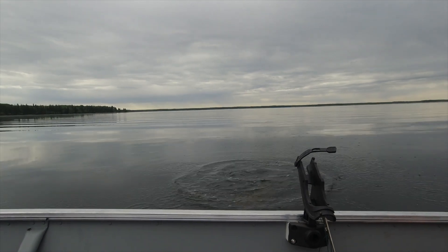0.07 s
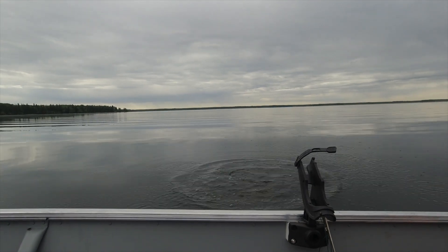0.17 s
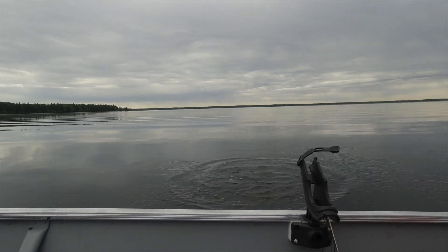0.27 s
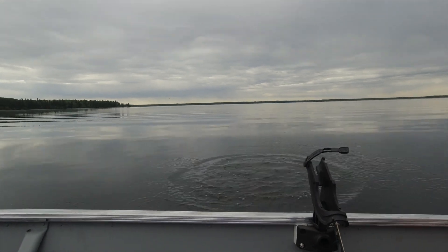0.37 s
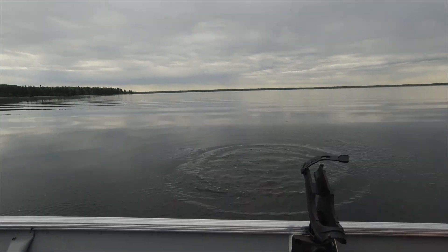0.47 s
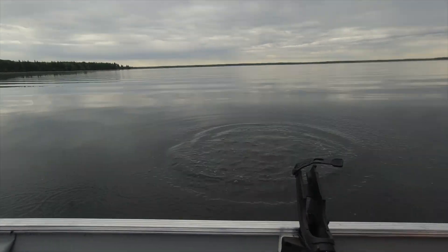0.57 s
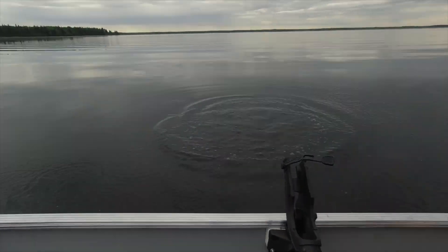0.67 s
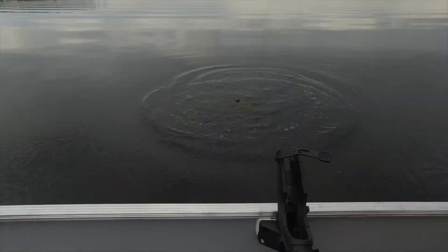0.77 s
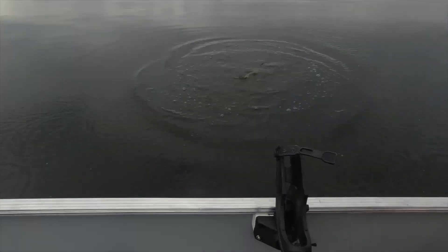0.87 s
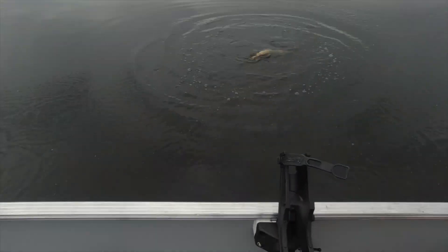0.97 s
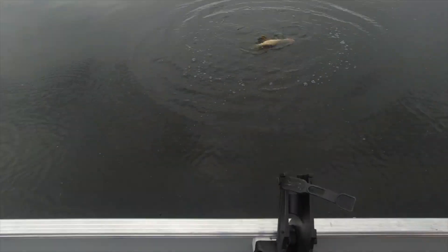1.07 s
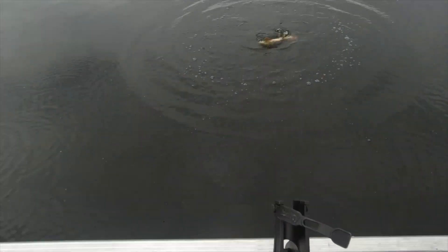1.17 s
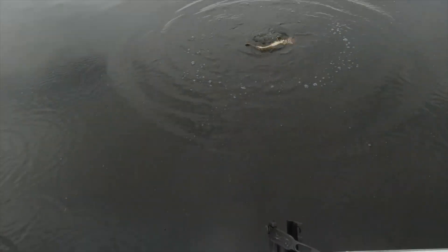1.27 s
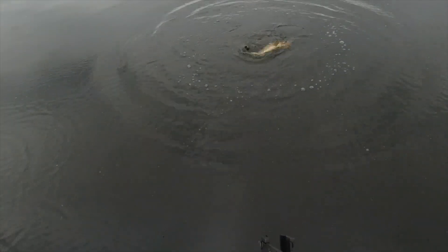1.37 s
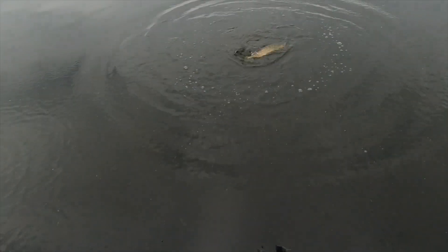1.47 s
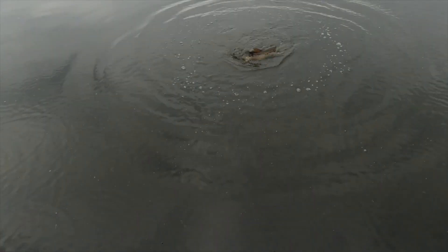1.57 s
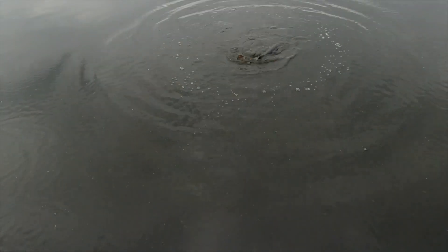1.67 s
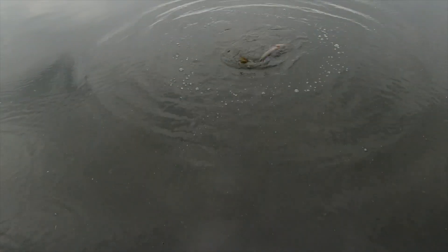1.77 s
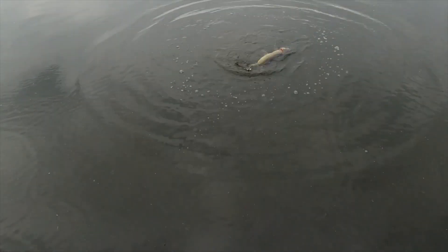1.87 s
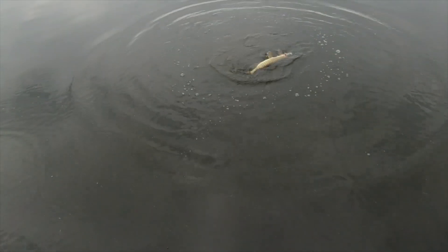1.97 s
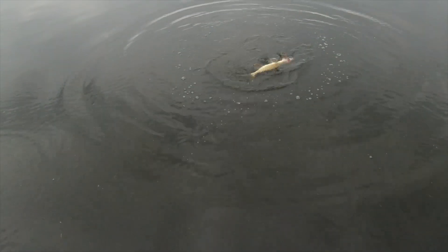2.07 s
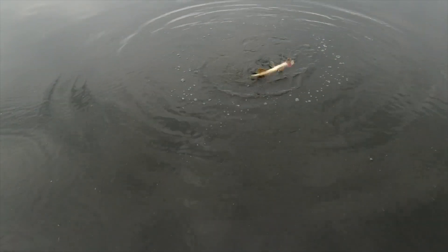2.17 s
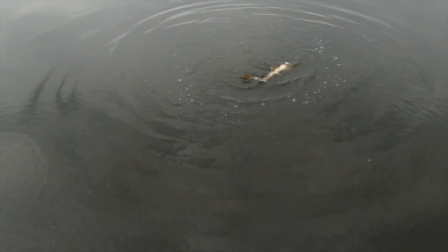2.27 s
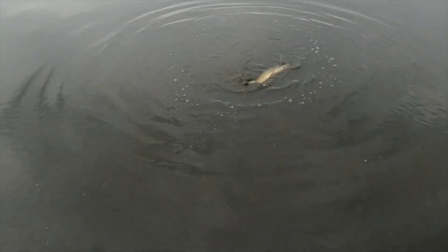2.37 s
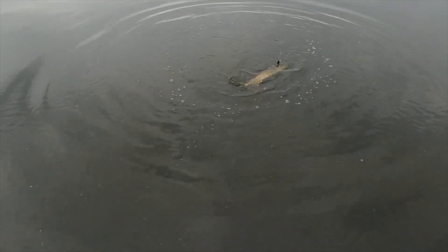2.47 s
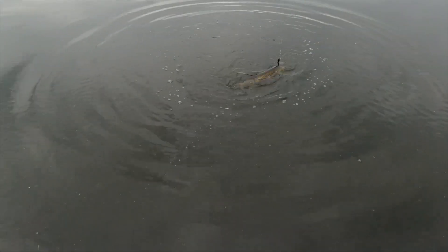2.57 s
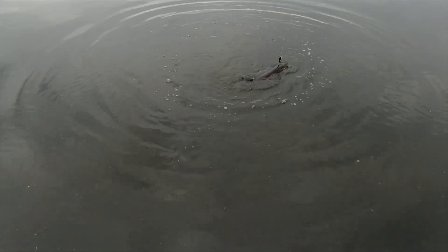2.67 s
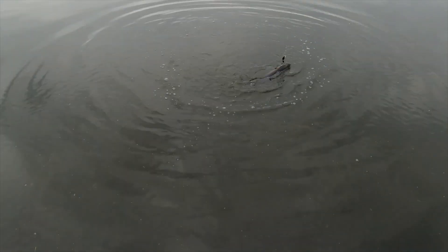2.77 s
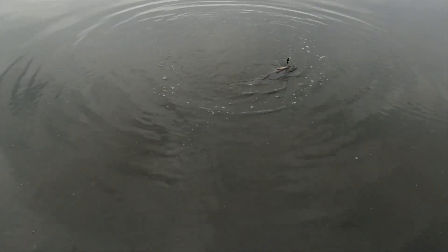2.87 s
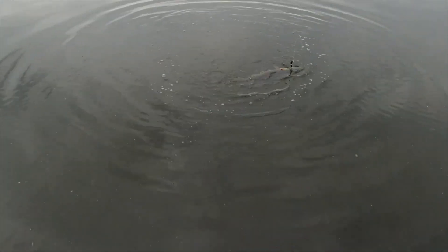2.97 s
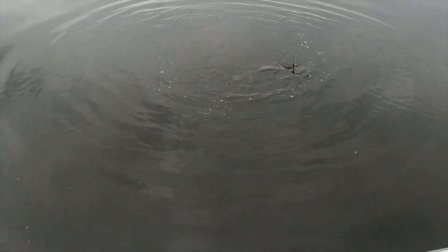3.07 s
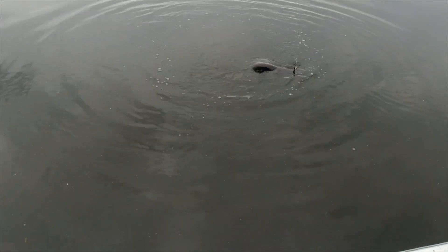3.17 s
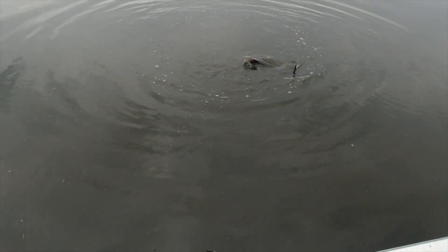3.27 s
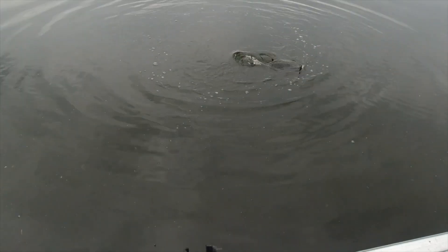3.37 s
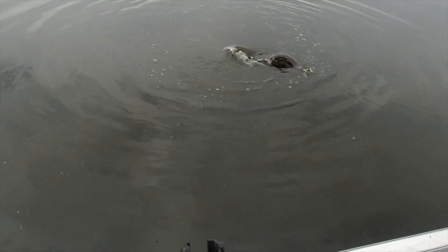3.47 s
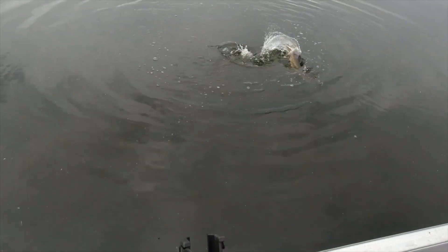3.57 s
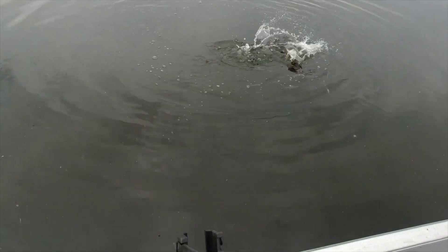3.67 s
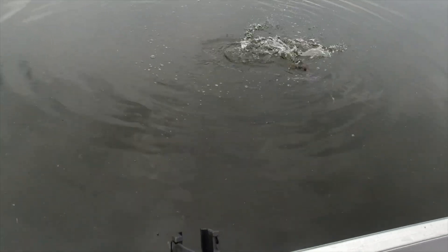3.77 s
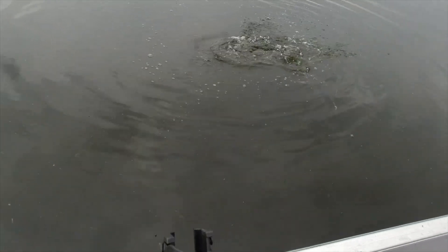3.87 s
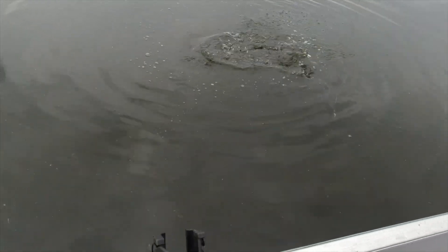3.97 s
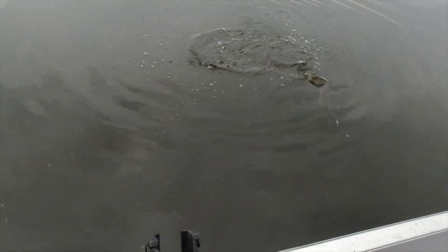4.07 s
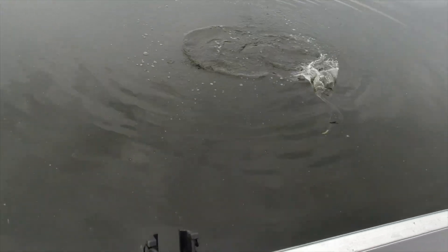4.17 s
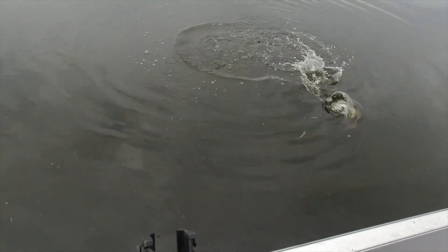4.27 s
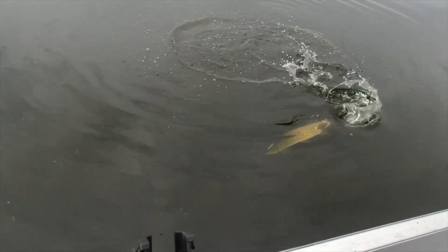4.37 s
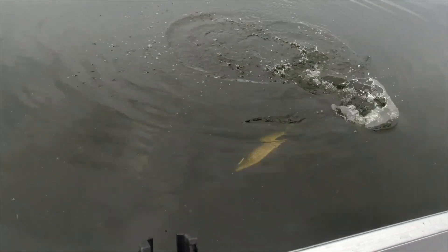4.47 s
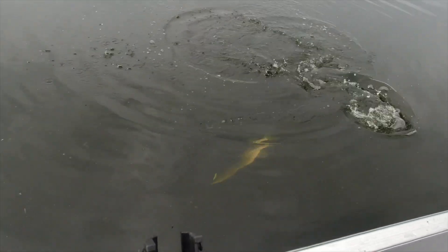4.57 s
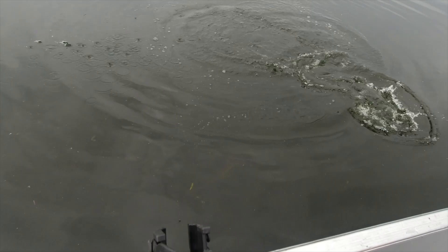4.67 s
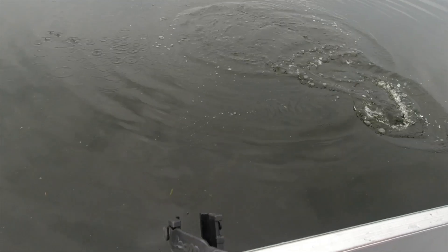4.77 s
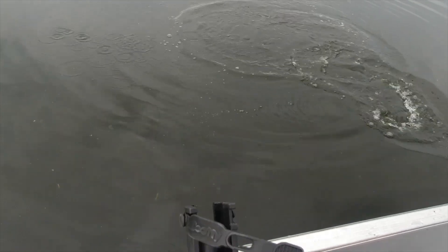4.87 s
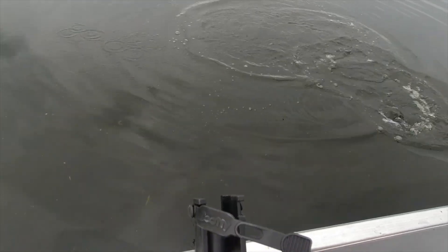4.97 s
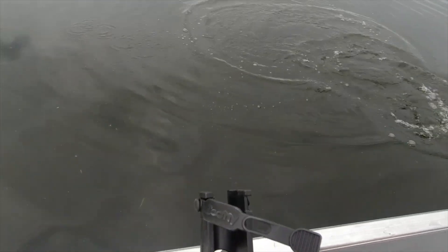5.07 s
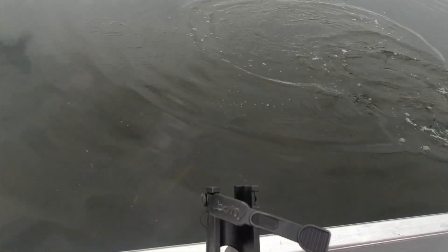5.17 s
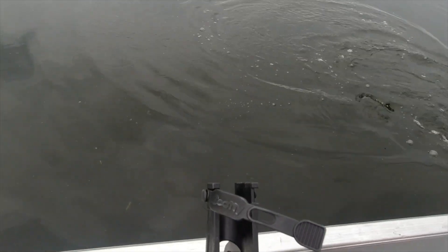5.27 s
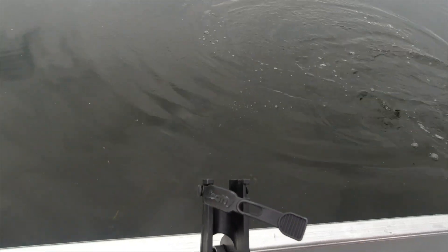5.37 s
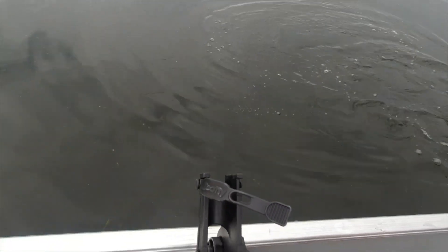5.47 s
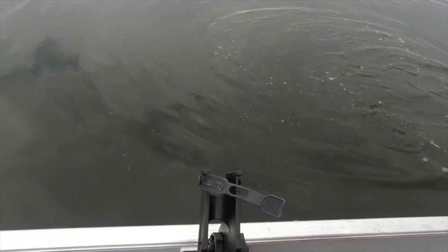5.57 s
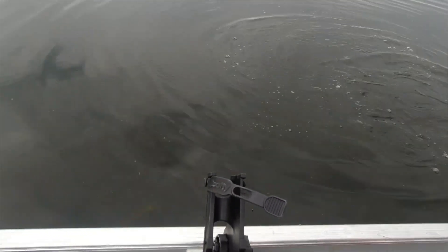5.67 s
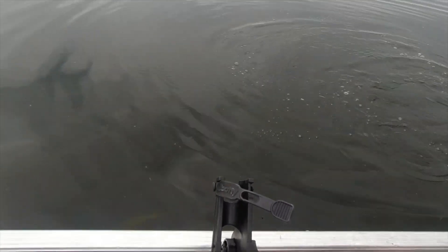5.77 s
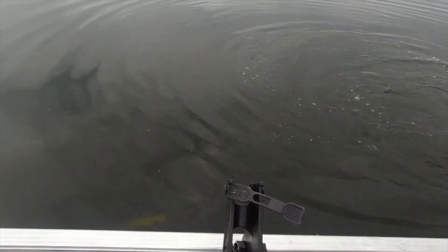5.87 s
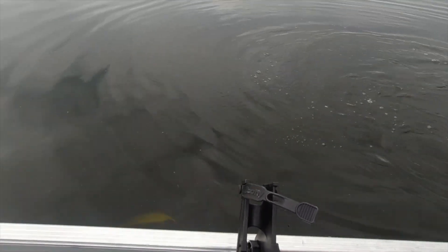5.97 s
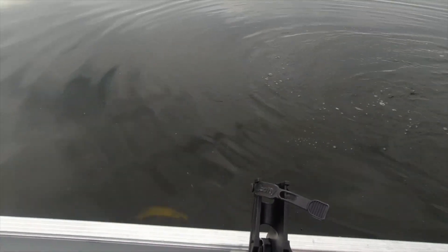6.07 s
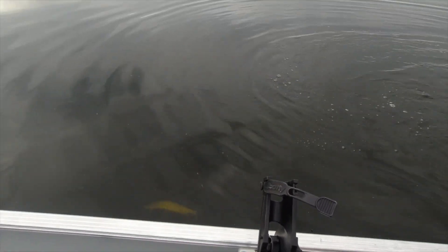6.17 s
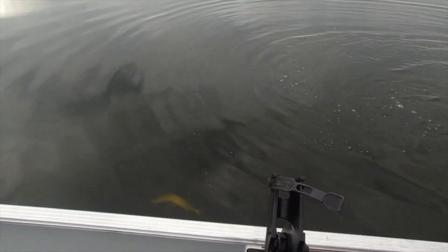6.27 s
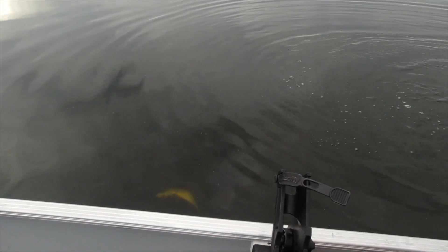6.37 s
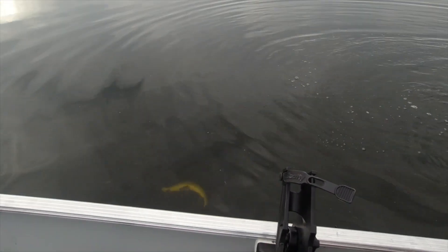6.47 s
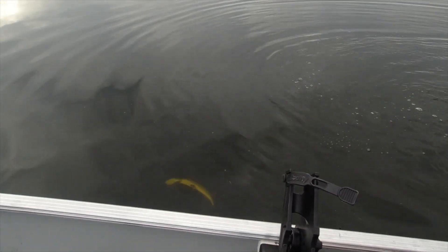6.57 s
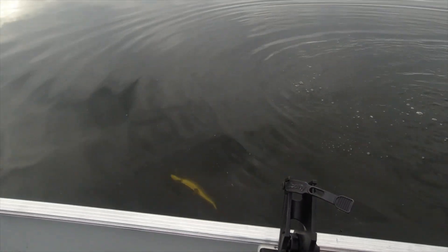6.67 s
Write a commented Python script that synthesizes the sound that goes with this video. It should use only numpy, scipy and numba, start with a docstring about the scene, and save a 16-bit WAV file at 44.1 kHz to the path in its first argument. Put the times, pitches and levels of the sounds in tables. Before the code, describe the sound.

A deep handling rumble and a few dull knocks on a metal boat hull come first, close to the microphone. Small drips and bubbles plink on a calm lake. A fish then flicks lightly at the surface twice and thrashes twice more, much louder, with gurgling water and crackling spray. The splashing dies away into a faint fizz of foam and a few last drips over very quiet ripples.

```python
"""A deep rumble and dull hull knocks come first, as a camera is jostled in a metal boat on a calm lake.
Drips follow, then a fish thrashes at the surface four times. Trapped air bubbles resonate and glide in
pitch, large ones gurgling low and small ones pinging high, while droplet impacts crackle as spray.
Foam fizzes afterwards, over lapping ripples, a faint hum, far tones and a distant bird."""
import sys
import numpy as np
from scipy import signal
from scipy.fft import rfft, irfft
from scipy.io import wavfile
from scipy.ndimage import uniform_filter1d
from numba import njit

SR = 44100
rng = np.random.default_rng(int(sys.argv[2]) if len(sys.argv) > 2 else 0)


def generate_wav(signal):
    """Clip the signal to [-1, 1] and save it as 16-bit WAV at the path in sys.argv[1]."""
    frames = np.transpose(np.atleast_2d(signal))
    scaled = np.clip(frames, -1, 1) * 32767
    pcm = np.round(scaled).astype(np.int16)
    wavfile.write(sys.argv[1], SR, pcm)


N = 296175

# Envelopes, one span for each thrash of the fish: time_s, spray_gain_db, gurgle_gain_db
THRASHES = [
    [(2.95, -70, -91), (2.966, -57, -59), (2.974, -38, -57), (3.008, -55, -53), (3.018, -43, -50.5),
     (3.12, -100, -75), (3.16, -110, -87)],
    [(3.26, -79, -94), (3.308, -53.5, -66), (3.354, -76, -60), (3.4, -77, -110)],
    [(3.43, -65, -90), (3.448, -52, -58), (3.47, -52.5, -40.5), (3.538, -36, -33), (3.66, -45.5, -41.5),
     (3.706, -37.5, -44.5), (3.864, -47, -54.5), (3.96, -57, -60.5), (4.02, -75, -90)],
    [(4.166, -48.5, -75), (4.222, -39.5, -31.5), (4.272, -40.5, -28.5), (4.43, -34.5, -33.5),
     (4.596, -41, -31.5), (4.63, -33, -35.5), (4.724, -52, -40), (4.852, -50, -46.5), (4.92, -57.5, -45),
     (5.05, -97, -61.5), (5.12, -100, -71)],
]
# Middle resonance of the large bubbles in each thrash: pitch_hz
GURGLE_PITCHES = [594, 910, 902, 789.5]
# Mist against spray in each thrash (a light flick throws little): gain_db
MIST_GAINS = [-28, -31, -12.5, -13]
# Single bubbles: start_s, pitch_hz, target_hz, t60_s, level_db
BUBBLES = [(0.975, 2620, 2250, 0.02, -56.5), (1.011, 1390, 1230, 0.046, -45.5),
           (1.011, 4280, 4500, 0.018, -46.5), (1.018, 1120, 930, 0.082, -45.5),
           (1.163, 1500, 1420, 0.076, -46.5), (1.172, 1026, 1350, 0.11, -52),
           (1.18, 1530, 2100, 0.051, -57), (1.221, 920, 1290, 0.13, -55.5), (1.221, 2040, 2240, 0.045, -58),
           (1.224, 1580, 1315, 0.078, -54), (1.257, 1045, 1430, 0.059, -54), (1.34, 1600, 1620, .06, -62.5),
           (1.394, 1630, 2010, 0.039, -55), (1.415, 1780, 1894, 0.033, -55.5),
           (1.436, 1070, 860, 0.044, -47.5), (1.231, 2930, 2950, .027, -60), (1.27, 2530, 2400, .03, -62),
           (1.539, 2250, 2130, .04, -65), (1.655, 3460, 3500, .007, -47), (1.735, 1546, 1460, 0.027, -65),
           (2.378, 3359, 3340, 0.03, -62), (1.487, 2860, 2860, 0.02, -56.5), (1.498, 890, 990, 0.11, -61),
           (1.601, 4230, 4220, .022, -54), (1.645, 966, 792, 0.11, -44.5), (1.769, 2910, 2700, 0.11, -65),
           (1.779, 1850, 1690, .031, -54.5), (1.985, 2350, 2440, 0.037, -64.5),
           (2.16, 2410, 2320, .012, -54), (2.27, 1336, 1270, 0.046, -59), (2.333, 2260, 1959, 0.026, -58.5),
           (2.42, 766, 701, 0.28, -62), (2.418, 1990, 1650, 0.026, -51.5),
           (2.429, 1430, 1800, 0.051, -53.5), (2.443, 995, 826, .16, -59), (2.46, 1920, 1830, 0.097, -60.5),
           (2.469, 2720, 2560, 0.02, -42.5), (2.502, 2160, 2800, 0.019, -49), (2.558, 1980, 1800, .04, -63),
           (2.707, 1840, 2400, .037, -50), (2.708, 1557, 1600, 0.069, -43.5),
           (2.72, 1600, 1950, 0.048, -54), (2.784, 1133, 1400, 0.055, -44.5),
           (2.971, 2660, 2690, 0.18, -44.5), (2.974, 1330, 1420, 0.068, -44), (2.978, 377, 422, 0.32, -56),
           (3.017, 1310, 1295, 0.15, -55), (3.205, 1900, 1820, 0.023, -50.5),
           (3.216, 4260, 4000, 0.017, -39), (3.22, 2000, 1790, 0.022, -40.5),
           (3.231, 1421, 1320, 0.04, -58), (3.259, 4070, 4630, 0.033, -49.5), (3.28, 895, 940, 0.058, -54),
           (3.302, 1295, 1335, .19, -57.5), (3.307, 2940, 3300, 0.027, -48), (3.308, 799, 870, 0.17, -53.5),
           (3.311, 286, 266, 0.04, -51.5), (3.42, 2450, 2217, 0.028, -50.5), (3.431, 2750, 2720, 0.02, -49),
           (3.445, 1750, 1370, 0.12, -40), (3.449, 2500, 2370, 0.0064, -18), (3.466, 1710, 1690, .027, -37),
           (3.475, 422, 365, 0.1, -32), (3.486, 1440, 1655, 0.028, -18), (3.491, 436, 810, .12, -23),
           (3.52, 759, 934, .05, -24), (3.528, 1890, 2150, .036, -26.5), (3.56, 870, 1100, 0.039, -30),
           (3.564, 2720, 2880, 0.011, -19.5), (3.497, 637, 1070, .082, -32.5), (3.665, 575, 795, .08, -48),
           (3.684, 863, 1450, 0.08, -41), (3.582, 1695, 1800, 0.11, -37), (3.622, 1240, 1080, 0.036, -26.5),
           (3.713, 1076, 1480, 0.1, -41), (3.736, 1130, 1070, 0.023, -29), (3.75, 2300, 2100, .041, -41),
           (3.756, 837, 1070, 0.076, -33), (3.806, 2770, 2560, 0.036, -39),
           (3.815, 1074, 1190, 0.068, -38.5), (3.834, 720, 626, .043, -42.5),
           (3.883, 1260, 1270, .025, -34), (3.9, 504, 1110, 0.15, -48.5), (3.913, 1330, 1870, .121, -54),
           (3.929, 788, 1220, 0.21, -51.5), (3.97, 1220, 1680, 0.054, -52.5),
           (4.06, 2450, 2648, .022, -48.5), (4.076, 4242, 4440, 0.0097, -49),
           (4.116, 4020, 4050, 0.036, -47), (4.158, 2720, 2750, 0.013, -38),
           (4.159, 3400, 3420, 0.0034, -27.5), (4.216, 1370, 1250, 0.11, -30),
           (4.219, 1084, 1150, 0.098, -28), (4.227, 740, 700, .065, -27.5),
           (4.227, 2740, 2600, 0.062, -29.5), (4.259, 574, 628, 0.11, -28.5),
           (4.301, 363, 377, 0.31, -37.5), (4.31, 2550, 2440, 0.025, -26), (4.315, 873, 925, 0.083, -26.5),
           (4.328, 1240, 1170, 0.027, -24.5), (4.326, 1740, 1530, .017, -16),
           (4.362, 1024, 1140, 0.1, -32.5), (4.418, 685, 611, 0.18, -34.5), (4.44, 497, 542, 0.24, -30),
           (4.454, 1160, 1160, 0.027, -24), (4.491, 583, 860, 0.14, -29.5), (4.515, 895, 1190, .06, -34),
           (4.558, 618, 670, 0.14, -26.7), (4.61, 279, 275, .25, -35.5), (4.611, 584, 523, 0.23, -35),
           (4.666, 557, 566, 0.11, -33), (4.668, 292, 356, 0.22, -32.5), (4.675, 687, 950, 0.07, -30),
           (4.734, 1520, 1400, 0.058, -36), (4.751, 1460, 1580, 0.03, -34.5),
           (4.832, 1100, 1160, 0.043, -41), (4.848, 383, 444, 0.1, -43.5), (4.867, 1580, 1705, 0.16, -46),
           (4.915, 1052, 1270, 0.11, -43), (4.924, 1840, 1630, .017, -44), (4.949, 1820, 1780, 0.039, -45),
           (5.012, 474, 430, 0.067, -55), (5.015, 830, 810, .031, -45.5), (5.016, 2100, 2390, 0.017, -44),
           (5.291, 660, 630, 0.14, -53), (5.313, 1430, 1690, .063, -64), (5.328, 1700, 1330, 0.081, -59),
           (5.35, 690, 1685, 0.051, -44.5), (5.405, 2150, 2270, 0.058, -66), (5.44, 735, 722, 0.083, -63.5),
           (5.439, 1130, 1120, 0.079, -65), (5.485, 1640, 1530, 0.039, -53),
           (5.67, 2190, 2260, 0.044, -63.5), (6.307, 274.7, 283, 0.19, -60.5)]
# Drops and slaps striking the water: start_s, level_db, centre_hz
DROP_IMPACTS = [(0.822, -60, 2800), (0.856, -63, 5750), (0.9747, -59, 2470), (1.013, -50.5, 3730),
                (1.1619, -48.5, 2300), (1.2287, -53.5, 2960), (1.27, -56, 2440), (1.4082, -54, 3580),
                (1.4356, -50.5, 3140), (1.4671, -53.5, 4340), (1.487, -56, 2780), (1.6362, -53, 4350),
                (1.6543, -45.5, 3360), (1.7695, -52, 2810), (1.9226, -58, 2440), (2.1585, -52, 2640),
                (2.377, -55, 3350), (2.397, -50, 7500), (2.408, -55, 5400), (2.43, -55, 7150),
                (2.4482, -53.5, 3970), (2.7068, -50.5, 2070), (2.7683, -53.5, 4500), (2.9547, -37, 3640),
                (2.9702, -27.5, 3880), (3.0133, -50, 2430), (3.2141, -44.5, 4200), (3.2595, -53, 4010),
                (3.225, -45, 4500), (3.32, -59, 5440), (3.447, -30, 2500), (3.484, -26, 2000),
                (3.5048, -23, 2880), (3.562, -34, 2830), (3.6232, -23, 4660), (3.785, -38, 3830),
                (3.846, -27.5, 3820), (4.1164, -43.5, 4130), (4.1986, -21.5, 4470), (4.2263, -29, 2700),
                (4.2682, -23.5, 3370), (4.3107, -21.5, 2480), (4.3434, -21, 2300), (4.4195, -22, 4200),
                (4.4593, -19, 2290), (4.5195, -25, 3380), (4.6327, -17.5, 5070), (4.7551, -27.5, 2850),
                (4.8698, -32, 2280), (6.1238, -54.5, 6260), (6.6471, -46.5, 3100)]
# Envelopes, one span for each jostle of the camera: time_s, gain_db
JOSTLES = [
    [(0.0, -69.5), (0.238, -59), (0.285, -16.5), (0.45, -16), (0.6, -26), (0.78, -39.5), (0.9, -45),
     (1.08, -39), (1.23, -37.5), (1.304, -65), (1.45, -76)],
    [(4.24, -65.5), (4.29, -57), (4.4, -49), (4.455, -62), (4.5, -50), (4.66, -54), (4.72, -76)],
]
# Knocks on the hull: start_s, gain_db, hardness_db_per_mode
KNOCKS = [(0.35, -37, 8), (0.408, -37, 6.5), (0.513, -32.5, 3), (0.609, -39.5, 2.5), (0.734, -59, 6),
          (0.819, -69, 7.5), (1.051, -55.5, 5), (1.211, -66, 7), (2.519, -58.5, 7), (3.028, -47.5, 9),
          (4.286, -52, 9), (6.313, -52.5, 8)]
# Normal modes of the hull: pitch_hz, gain_db, t60_s
HULL_MODES = [(141.4, 4.5, 0.13), (225, -6.5, 0.17), (258, -17, 0.095), (340, -27, .15),
              (510, -33.5, 0.017)]
# Clacks of the camera housing: start_s, level_db, centre_hz, t60_s, relative_treble_db
CLACKS = [(.312, -63, 1200, .03, -38), (.343, -57, 2510, .03, -24), (.363, -34, 1080, .03, -49),
          (.367, -48.5, 4200, .015, -20), (.373, -38, 1080, .045, -47.5), (.409, -44, 3670, 0.02, -23.5),
          (.41, -46, 1680, .02, -39), (.422, -54.5, 3450, .02, -24.5), (.513, -51, 2770, .015, -21.5),
          (6.65, -57, 860, 0.11, -30), (6.69, -56, 870, 0.22, -22), (6.71, -53, 800, .06, -30)]
# Envelopes of foam, ripples and the rocking boat: time_s, fizz_db, lapping_db, rocking_db
LAKE_LEVELS = [(0.0, -67, -70, -73), (0.23, -74, -76, -68), (0.44, -87.5, -67, -76.5),
               (0.82, -79.5, -81, -70), (1.67, -77.5, -80.5, -71.5), (2.3, -79.5, -81.5, -72.5),
               (3.1, -80, -78.5, -76), (3.45, -75, -72.5, -68), (3.95, -70.5, -84, -70.5),
               (4.5, -56.5, -73, -61), (5.08, -70, -72, -61.5), (5.35, -70.5, -76, -64),
               (5.68, -76, -78.5, -66), (5.9, -77.5, -77.5, -67), (6.36, -81.5, -67.5, -69),
               (6.72, -75.5, -74, -59.5)]
# Spectrum of the foam: frequency_hz, gain_db
FIZZ_SPECTRUM = [(900, 2.5), (2000, 3), (3300, 1.5), (4800, 2.5), (6500, -4), (9000, -8), (12500, -14)]
# Spectrum of the still air: frequency_hz, gain_db
AIR_SPECTRUM = [(53, -31.5), (90, 10), (255, -3.5), (623, -15), (706, -13.5), (869, -6), (1800, -18),
                (5430, -25.5), (12200, -33), (13000, -39)]
# Partials of the hum: pitch_hz, level_db
HUM_PARTIALS = [(64, -78), (129, -79)]
# Far tones: start_s, pitch_hz, target_hz, swell_s, t60_s, level_db
FAR_TONES = [(1.25, 625, 623, 0.086, 3, -79.5), (2.749, 305, 286, 0.12, .8, -73),
             (2.998, 174, 176.3, 0.065, 0.55, -62.5), (3.301, 411, 417, 0.072, 0.41, -67.5),
             (4.0, 668, 659, 0.11, 0.6, -75.5)]
# Chips of a far bird: start_s, level_db
BIRD_CHIPS = [(6.078, -78), (6.195, -83), (6.312, -77), (6.433, -75.5), (6.552, -77)]


def gurgle():
    """Large air pockets resonate low; many overlapping resonances merge into a gurgle."""
    centre_hz = each_thrash(GURGLE_PITCHES, between=800)
    pockets = swarm(count=1800, centre_hz=centre_hz, octaves=1.6, cycles=20, rise=.35, scatter_db=3.3)
    return unit(pockets + .6 * noise_band(520, 1300)) * undb(curve(THRASHES, 2) - 5.5)


def spray():
    """Droplet impacts click and small bubbles resonate; each size of drop falls in its own patches."""
    out = 0
    for hz in (1800., 2900., 4500.):
        pings = swarm(count=1400, centre_hz=hz, octaves=.8, cycles=20, rise=.25, scatter_db=4.2)
        clicks = unit(band(crackle(per_s=1500, scatter_db=.85, hiss=.64), .66 * hz, 1.154 * hz))
        out = out + (pings + 1.07 * clicks) * undb(3.1 * walk(45))
    return unit(out) * undb(curve(THRASHES, 1))


def mist():
    """The finest impacts superpose into a hiss that grows and fades more steeply than the spray."""
    spectrum = [(4000, -14.5), (5800, -6.5), (8000, -8), (11000, -14), (15500, -21), (17000, -22.5)]
    hiss = coloured(crackle(per_s=2700, scatter_db=1.4, hiss=.32), spectrum)
    spray_db = curve(THRASHES, 1)
    steepening_db = .42 * (spray_db + 34.5)
    return hiss * undb(spray_db + each_thrash(MIST_GAINS, between=0) + steepening_db + 3.6 * walk(67))


def bubbles():
    """Minnaert resonance: a bubble pinches off with a snap, then its air acts as a spring on the water."""
    start_s, hz, target_hz, t60_s, level_db = np.array(BUBBLES, float).T
    climb_octaves = np.maximum(np.log2(target_hz / hz), 0)
    swell_s = .87 / hz + .012 * climb_octaves ** 2
    snaps = np.zeros(N)
    snap_sizes = undb(level_db + 1) * .0002 / swell_s  # an abrupt onset snaps harder
    np.add.at(snaps, (start_s * SR).astype(int), snap_sizes)
    ruffle = undb(1.2 * walk(200))  # the rippling surface ruffles each ring
    rings = ring(start_s, hz, target_hz, swell_s, t60_s, undb(level_db), glide_share=.22)
    return ruffle * rings + band(snaps, 750, 7000)


def drop_impacts():
    """A brief impact has a broad spectrum, so drops and slaps on the water sound as ticks."""
    t60_s, treble_db = .016, -27
    return bursts([row + (t60_s, treble_db) for row in DROP_IMPACTS], low_ratio=.52, high_ratio=1.36)


def camera_rumble():
    """Slow, irregular sway of the housing gives a deep rumble; friction adds a rough rub above it."""
    rub = undb(-28.5 + 3 * walk(30)) * noise_band(55, 125, order=3)
    sway = noise_band(22, 43.7, order=4)
    return (sway + rub) * uniform_filter1d(undb(curve(JOSTLES, 1)), 900)


def hull_knocks():
    """A blow excites the damped normal modes of the hull; a harder one favours the higher modes."""
    modes = [(start_s, hz, knock_db + mode_db + k * hardness_db, t60_s)
             for start_s, knock_db, hardness_db in KNOCKS
             for k, (hz, mode_db, t60_s) in enumerate(HULL_MODES)]
    start_s, hz, gain_db, t60_s = np.transpose(modes)
    detune, strength = rng.standard_normal((len(modes), 2)).T
    hz = hz * (1 + .021 * detune)
    swell_s = np.full(len(modes), .0035)
    return ring(start_s, hz, hz, swell_s, t60_s, undb(gain_db - 7.5 + 2.2 * strength), glide_share=1.)


def camera_clacks():
    """Resonance of the hollow housing confines most of each clack to a narrow band."""
    return bursts(CLACKS, low_ratio=.8, high_ratio=1.2)


def foam():
    """Tiny bubbles resonate high as foam pops; faint lone pops and droplets persist on the calm water."""
    pops = swarm(count=260, centre_hz=4400., octaves=.8, cycles=25, rise=.1, scatter_db=3.)
    droplets = unit(band(crackle(per_s=25, scatter_db=3., hiss=.01), 5000, 10500))
    fizz = coloured(crackle(per_s=1500, scatter_db=2.5, hiss=1.2), FIZZ_SPECTRUM) * undb(1.1 * walk(40))
    envelope = undb(curve([LAKE_LEVELS], 1) + .49 * walk(27))
    return (fizz + .35 * pops) * envelope + undb(-91.5) * (pops + .3 * droplets)


def ripples():
    """Slow motion makes low-frequency noise: ripples lap and the boat rocks gently."""
    lapping = noise_band(51, 280, order=1) * undb(curve([LAKE_LEVELS], 2) + .2 * walk(2.5))
    rocking = noise_band(4.1, 57, order=3) * undb(curve([LAKE_LEVELS], 3) + 1.7 * walk(2.2))
    return lapping + rocking


def air():
    """Still air is a nearly steady broadband noise, weighted to the bass."""
    return coloured(rng.standard_normal(N), AIR_SPECTRUM) * undb(-85.5 + .38 * walk(.98))


def hum():
    """Two low partials waver under slow random amplitude and frequency modulation."""
    out = 0
    for hz, level_db in HUM_PARTIALS:
        amplitude = undb(level_db + 2.9 * walk(.9))
        phase = 2 * np.pi * hz * np.cumsum(1 + .0037 * walk(7.8)) / SR
        out = out + amplitude * np.sin(phase)
    return out


def far_chirr():
    """Narrowband noise is heard as a thin whistle; random amplitude modulation makes it throb."""
    start_s, end_s = 2.05, 3.4
    t = np.arange(N) / SR
    return noise_band(3170, 3470) * undb(-87 + 4 * walk(40)) * (t > start_s) * (t < end_s)


def far_tones():
    """Faint tones from across the water swell, then decay exponentially with a fluttering level."""
    start_s, hz, target_hz, swell_s, t60_s, level_db = np.array(FAR_TONES, float).T
    tones = ring(start_s, hz, target_hz, swell_s, t60_s, undb(level_db), glide_share=.32)
    return tones * undb(3.4 * walk(44))


def bird():
    """A far bird repeats one chip, a damped tone sweeping down in frequency."""
    start_s, level_db = np.transpose(BIRD_CHIPS)
    each = np.ones(len(start_s))
    return ring(start_s, hz=5800 * each, target_hz=4600 * each, swell_s=.012 * each, t60_s=.06 * each,
                size=undb(level_db), glide_share=.2)


@njit
def ring(start_s, hz, target_hz, swell_s, t60_s, size, glide_share):
    """Damped oscillators: a rising pitch accelerates, as in a surfacing bubble; a falling one settles."""
    out = np.zeros(N)
    for k in range(len(start_s)):
        onset, phase = int(start_s[k] * SR), 0.
        glide_s = swell_s[k] + glide_share * t60_s[k]
        for i in range(min(int((swell_s[k] + .8 * t60_s[k]) * SR), N - onset)):
            t = i / SR
            glide = min(t / glide_s, 1.12) ** 1.8 if target_hz[k] > hz[k] else 1 - np.exp(-2 * t / glide_s)
            phase += 2 * np.pi * hz[k] * (target_hz[k] / hz[k]) ** glide / SR
            envelope = t / swell_s[k] if t < swell_s[k] else 1000. ** ((swell_s[k] - t) / t60_s[k])
            out[onset + i] += size[k] * envelope * np.sin(phase)
    return out


def swarm(count, centre_hz, octaves, cycles, rise, scatter_db):
    """Random bubbles ring for similar numbers of cycles, so small, high ones die soonest."""
    when, pitch, strength, life = rng.random((count, 4)).T
    hz = (centre_hz * np.ones(N))[(when * N).astype(int)] * 2 ** (octaves * (pitch - .5))
    size = undb(-scatter_db * np.log(1 - .995 * strength))
    t60_s = cycles * (.75 + life) / hz
    return unit(ring(when * N / SR, hz, hz * (1 + rise * life), 1 / hz, t60_s, size, glide_share=.3))


def crackle(per_s, scatter_db, hiss):
    """Shot noise: independent droplet clicks of uneven size, over a share of smooth hiss."""
    chance, strength = rng.random((2, N))
    size = undb(-scatter_db * np.log(1 - .99 * strength))
    clicks = (chance < per_s / SR) * size * rng.standard_normal(N)
    return unit(clicks) + hiss * rng.standard_normal(N)


def bursts(table, low_ratio, high_ratio):
    """Impact transients: exponentially decaying noise in a band about each centre, plus a treble spit."""
    out, t = np.zeros(N), np.arange(3000) / SR
    for start_s, level_db, centre_hz, t60_s, treble_db in table:
        noise = rng.standard_normal(len(t)) * 1000. ** (-t / t60_s)
        body = band(noise, low_ratio * centre_hz, high_ratio * centre_hz)
        spit = band(noise, 5300, 10500)
        burst = body / np.abs(body).max() + undb(treble_db) * spit / np.abs(spit).max()
        onset = int(start_s * SR)
        out[onset:onset + len(t)] += undb(level_db) * burst[:N - onset]
    return out


def each_thrash(values, between):
    """A step function holding one value through each thrash."""
    spans = [[(rows[0][0], value), (rows[-1][0], value)] for rows, value in zip(THRASHES, values)]
    return curve(spans, 1, between)


def curve(spans, column, between=-130):
    """Linear interpolation in time within each span, constant outside them."""
    t, out = np.arange(N) / SR, np.full(N, float(between))
    for rows in map(np.array, spans):
        inside = (t >= rows[0, 0]) & (t <= rows[-1, 0])
        out[inside] = np.interp(t[inside], rows[:, 0], rows[:, column])
    return out


def walk(rate_hz):
    """Random modulation: held steps, smoothed twice, with a spread near 1."""
    hold = int(SR / rate_hz)
    steps = np.repeat(rng.standard_normal(N // hold + 1), hold)
    return 1.59 * uniform_filter1d(uniform_filter1d(steps, hold), hold)[:N]


def coloured(x, spectrum):
    """Spectral shaping by (frequency_hz, gain_db) points, at unit rms."""
    hz, db = np.transpose(spectrum)
    bins_hz = np.arange(N // 2 + 1) * SR / N + 1
    gain = undb(np.interp(np.log(bins_hz), np.log(hz), db, right=-60))
    return unit(irfft(rfft(x) * gain, N))


def noise_band(low_hz, high_hz, order=2):
    """Band-limited noise at unit rms."""
    return unit(band(rng.standard_normal(N), low_hz, high_hz, order))


def band(x, low_hz, high_hz, order=2):
    """Band-pass filtering."""
    return signal.sosfilt(signal.butter(order, [low_hz, high_hz], "band", fs=SR, output="sos"), x)


def undb(db):
    """Decibels to amplitude ratio."""
    return 10 ** (np.asarray(db) / 20)


def unit(x):
    """Scaling to unit rms."""
    return x / np.sqrt(np.mean(x ** 2))


def scene():
    """Linear superposition: the pressures of all sources add in one channel."""
    impacts = bubbles() + drop_impacts() + camera_clacks()
    fish = gurgle() + spray() + mist()
    boat = camera_rumble() + hull_knocks()
    background = foam() + ripples() + air() + hum() + far_chirr() + far_tones() + bird()
    return (impacts + fish + boat + background)[None]


def record(dry):
    """Band limiting: a steep low-pass filter removes the highest treble."""
    cutoff_hz = 15900
    return signal.sosfilt(signal.ellip(10, .2, 80, cutoff_hz, fs=SR, output="sos"), dry)


dry = scene()
out = record(dry)
generate_wav(out)
```